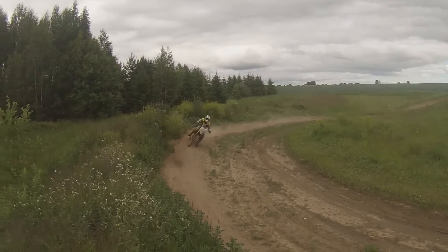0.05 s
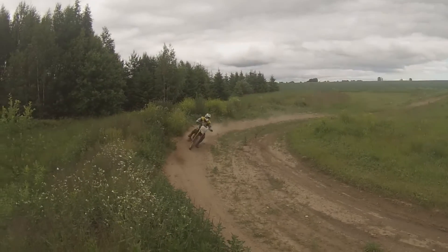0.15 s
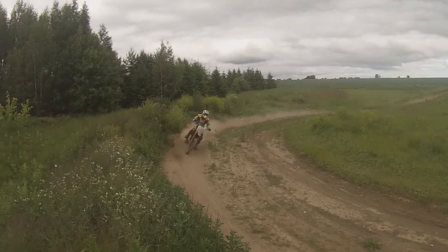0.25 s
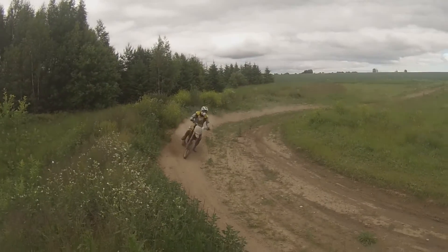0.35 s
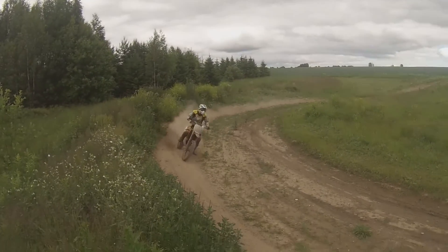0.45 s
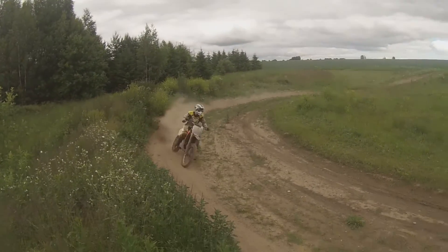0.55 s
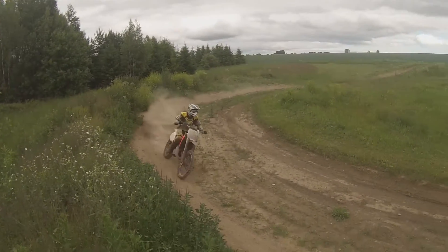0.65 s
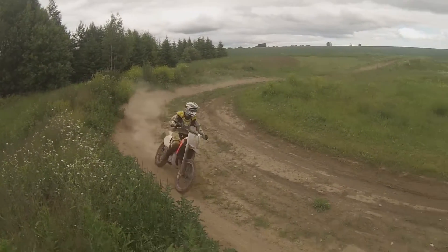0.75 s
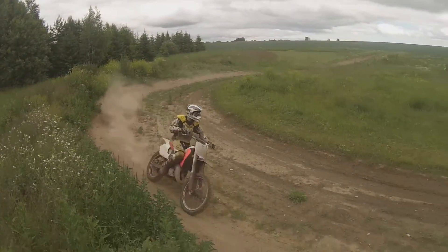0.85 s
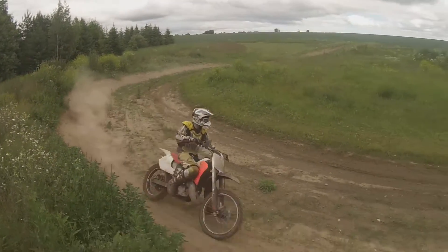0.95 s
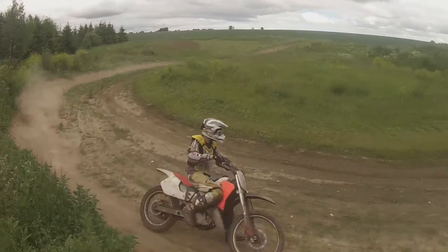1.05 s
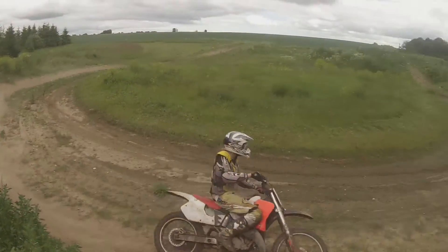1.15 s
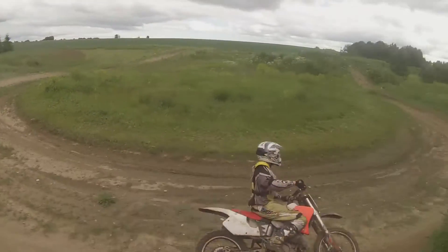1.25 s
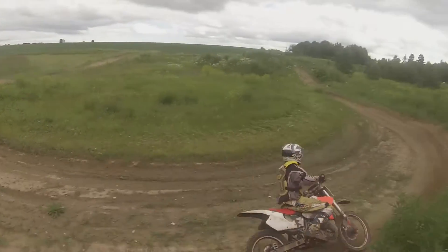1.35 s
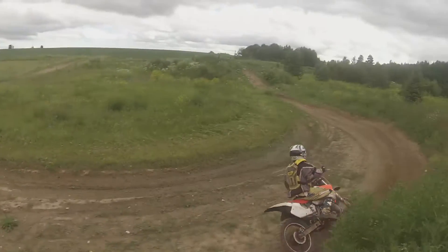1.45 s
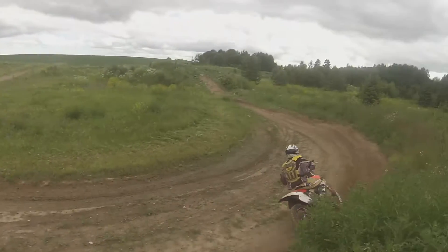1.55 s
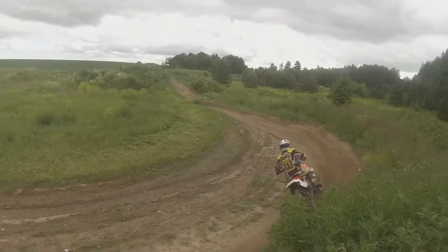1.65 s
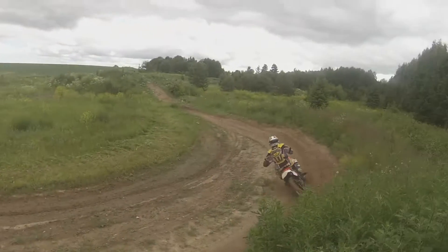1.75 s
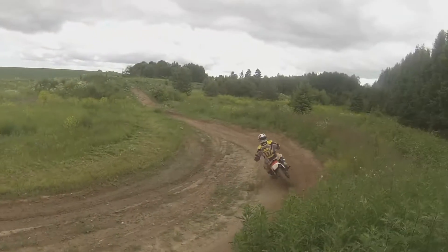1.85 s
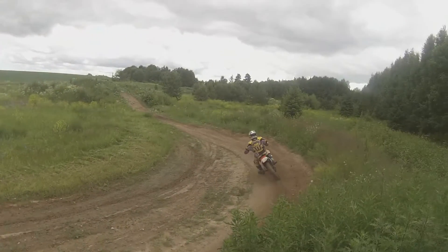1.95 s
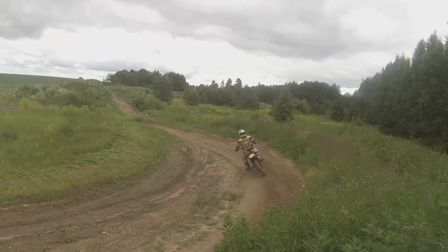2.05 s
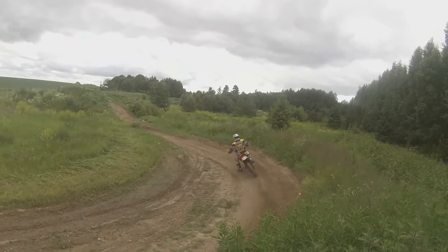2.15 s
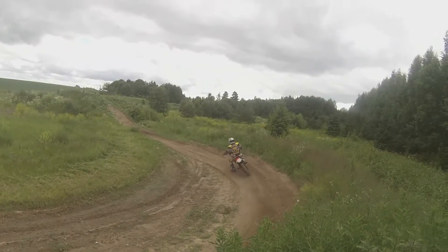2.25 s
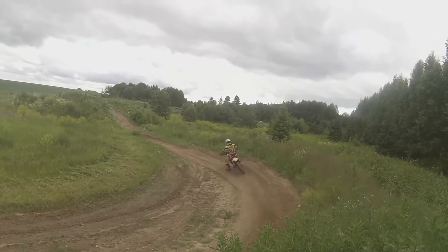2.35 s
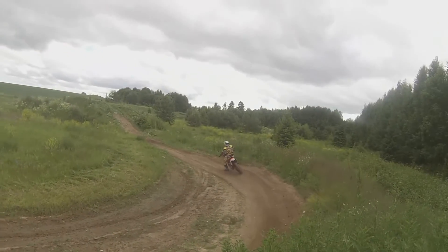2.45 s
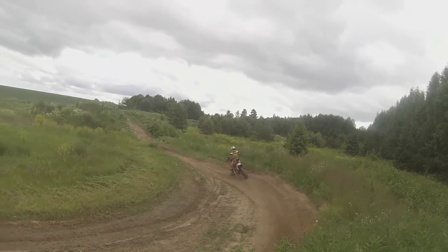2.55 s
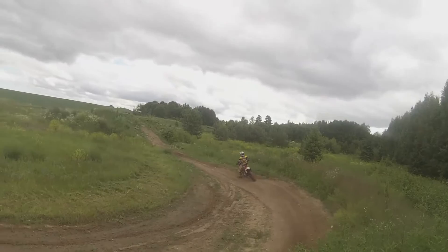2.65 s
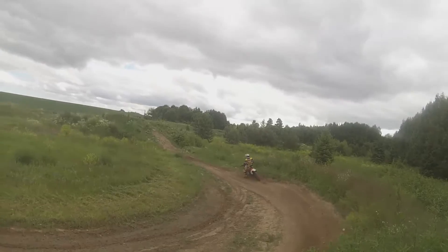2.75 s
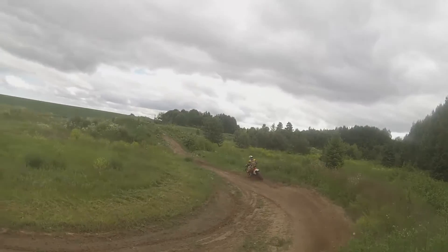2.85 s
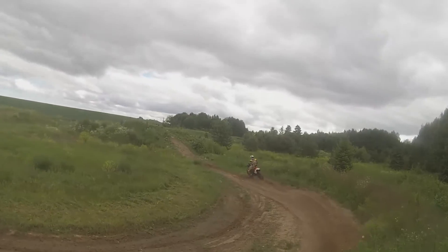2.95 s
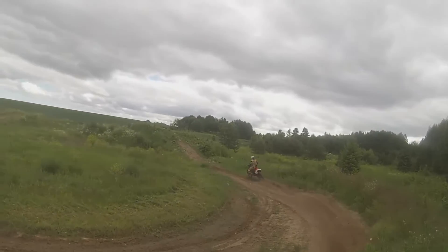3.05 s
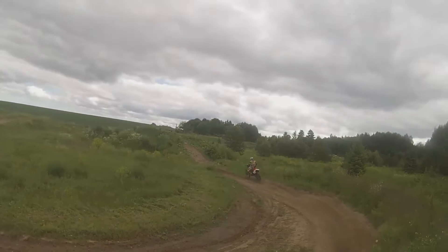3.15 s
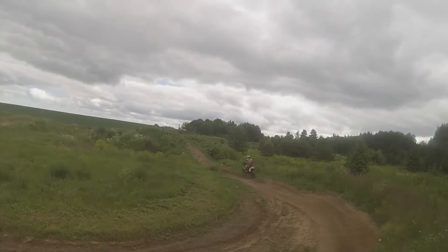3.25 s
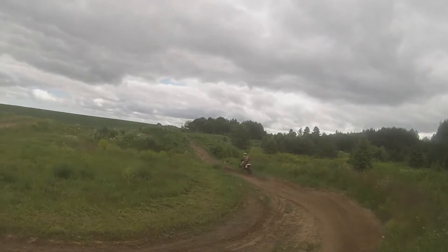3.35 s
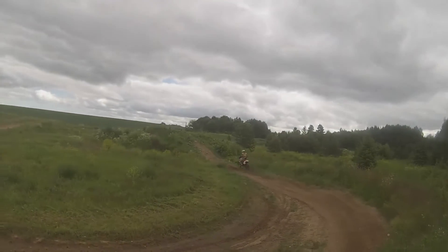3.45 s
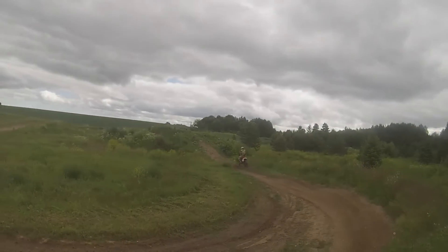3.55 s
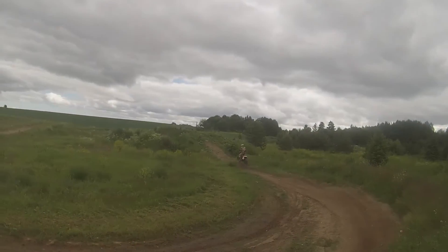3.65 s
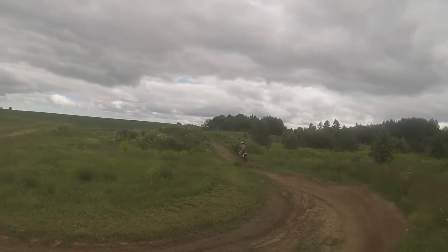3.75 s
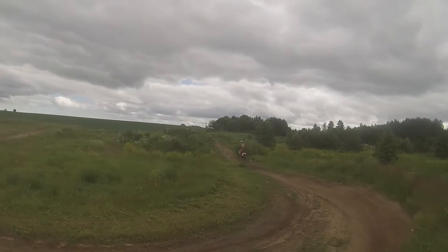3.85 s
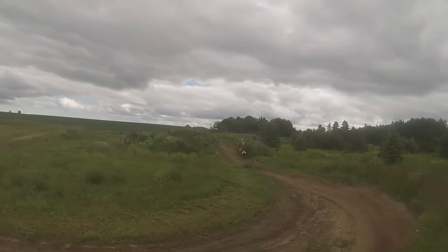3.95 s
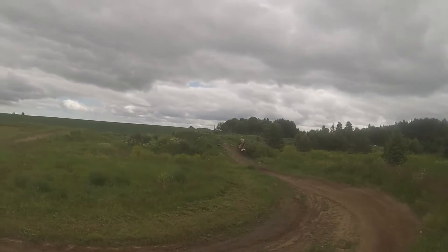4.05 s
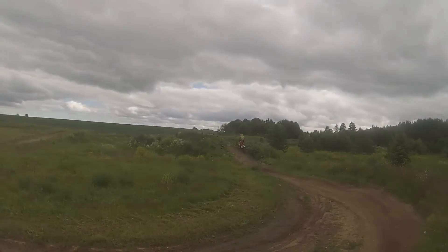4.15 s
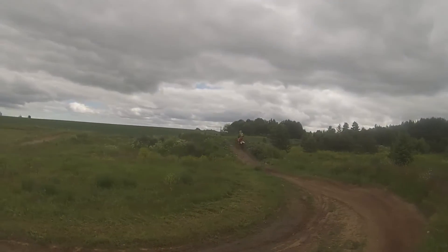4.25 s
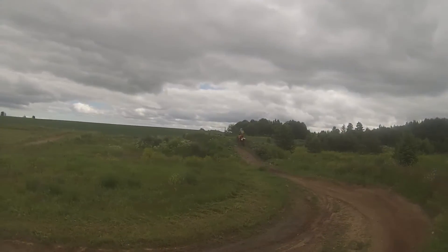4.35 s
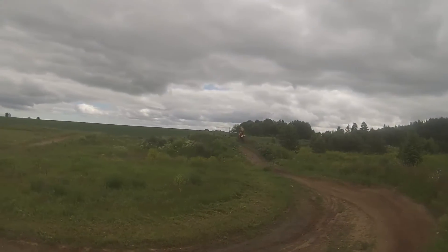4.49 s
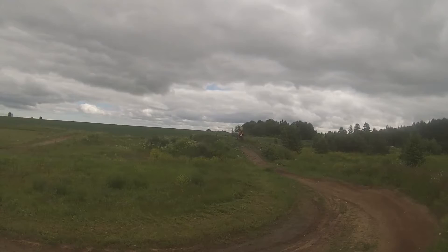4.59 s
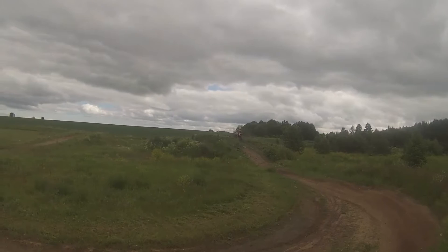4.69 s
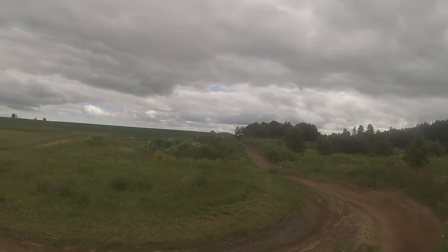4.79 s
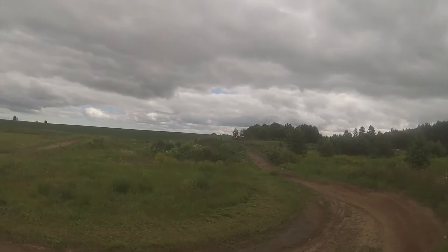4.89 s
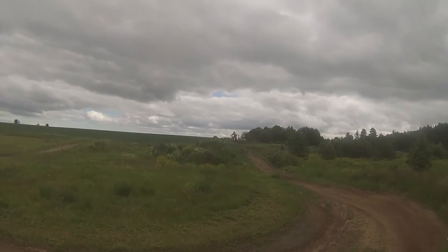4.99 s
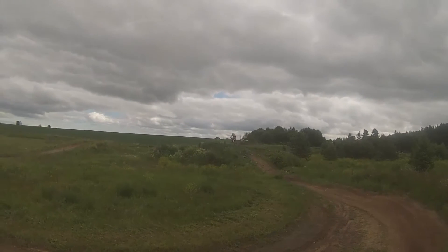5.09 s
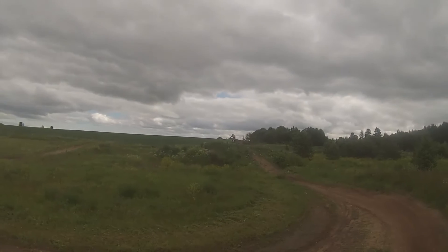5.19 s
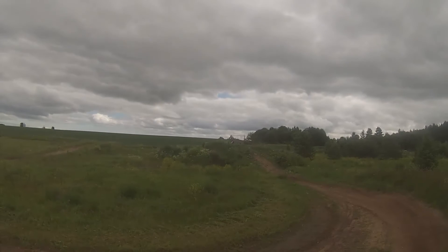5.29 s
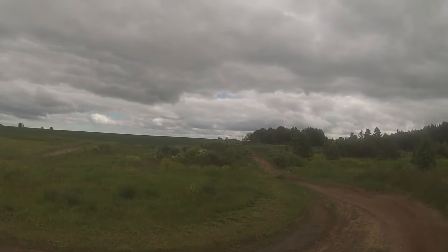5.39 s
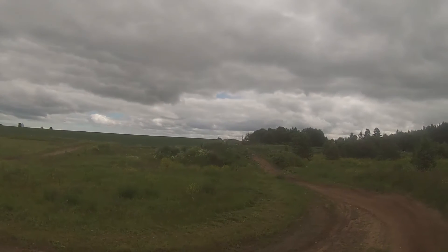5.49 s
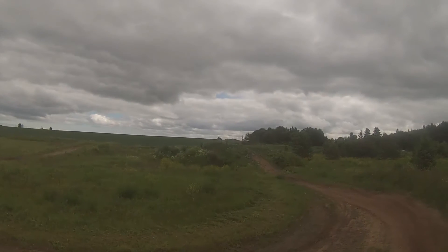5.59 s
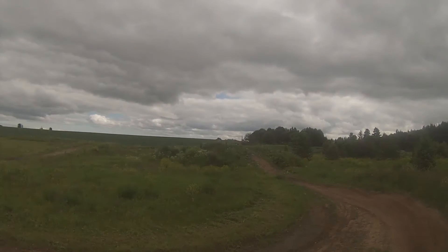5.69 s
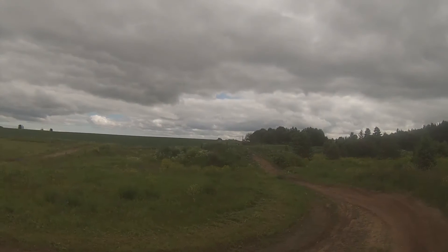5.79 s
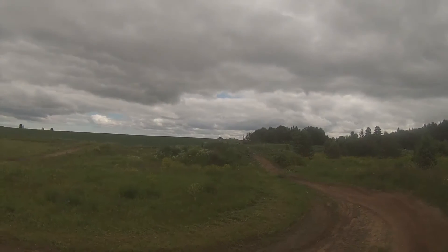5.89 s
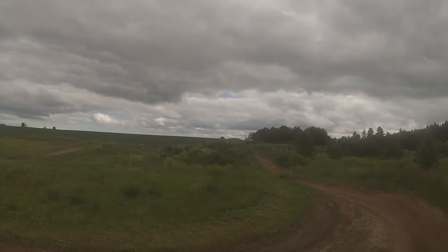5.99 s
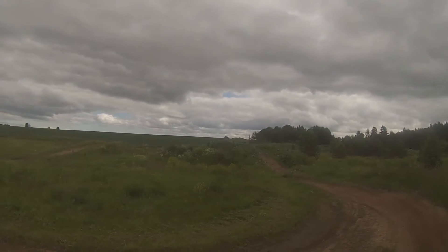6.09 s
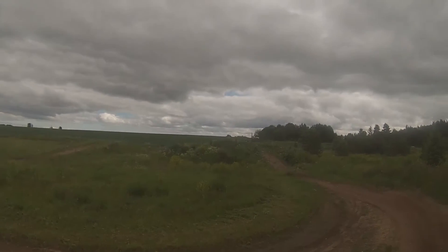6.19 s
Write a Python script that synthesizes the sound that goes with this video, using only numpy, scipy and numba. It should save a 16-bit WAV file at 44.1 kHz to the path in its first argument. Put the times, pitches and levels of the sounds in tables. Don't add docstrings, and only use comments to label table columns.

```python
import sys
import numpy as np
from scipy import signal
from scipy.fft import rfft, irfft, next_fast_len
from scipy.io import wavfile
from scipy.ndimage import uniform_filter1d
from numba import njit

SR = 44100
rng = np.random.default_rng(int(sys.argv[2]) if len(sys.argv) > 2 else 0)


def linear_from_db(decibels):
    return 10 ** (np.asarray(decibels, float) / 20)


def unload_wav(signal):
    wavfile.write(
        sys.argv[1],
        SR,
        np.round(np.clip(np.atleast_2d(signal).T, -1, 1) * 32767).astype(np.int16),
    )


N = 274743

# (frequency [Hz], level [dB per Hz])
FIELD_SPECTRUM = [(47, -29), (80, 9.5), (168, -3), (347, 1.5), (503, -2), (1380, -7), (1640, -4),
                  (2140, -8.5), (2900, -10.5), (3860, -15), (11300, -25.5), (15000, -52)]
FIELD_DB, HISS_DB = -58, -73.5
# (time [s], level [dB])
WIND = [(0, -61), (.99, -54.5), (1.87, -56.5), (3.09, -59), (3.42, -53), (4, -62), (4.6, -59), (5.05, -55),
        (5.74, -60.5), (6.23, -53.5)]
# (time [s], peak [dB], pitch [Hz])
THUMPS = [(4.939, -36, 82.1), (5.032, -58, 78.5), (5.16, -39, 80), (5.235, -42, 80.3), (5.29, -43, 81.1),
          (5.358, -51, 77.5), (5.46, -45, 82), (5.889, -52, 79.7), (5.993, -34.5, 83.9), (6.039, -39, 80.6),
          (6.09, -40, 80.2), (6.123, -41, 80.6), (6.178, -43.5, 80.1)]
# (time [s], peak [dB], length [s])
CHIRPS = [(3.7164, -65, 0.033), (3.808, -62, 0.026), (3.915, -65, 0.047), (4.019, -63, 0.029),
          (4.107, -66, 0.03), (4.204, -67, 0.024), (4.391, -62, 0.031), (4.5144, -76, 0.031),
          (4.5624, -67, 0.03), (4.6126, -62, 0.022), (4.7289, -67, 0.033), (5.0192, -65, 0.027),
          (5.0473, -73, 0.026), (5.1494, -62, 0.025), (5.3854, -63, 0.025), (5.41, -62, 0.023),
          (5.445, -64, 0.025), (5.255, -68, 0.026), (5.955, -66, 0.027), (5.512, -63, 0.019),
          (5.6214, -70, 0.027), (5.714, -65, 0.03), (5.8119, -67, 0.026), (5.922, -63, 0.023),
          (6.045, -63, 0.027), (6.1137, -66, 0.027), (6.212, -66, 0.028)]

# (time [s], firing rate [Hz], level as heard [dB], aim of the tail pipe at the microphone [dB])
PULL_IN = [(0, 119.6, -43, -3), (.085, 123.5, -42.5, -1.5), (.175, 114, -42.5, -1), (.225, 113.4, -43, 2),
           (.265, 105.8, -42.5, 1), (.35, 111.9, -41.5, 2.5), (.43, 123.4, -38.5, 1),
           (.5, 124.6, -36.5, -1), (.545, 128.1, -36.5, -2.5)]
BEND = [(.59, 113.3, -36, -3), (0.649, 112.4, -36, -1.5), (0.676, 114.8, -34.5, -5),
        (0.726, 112.4, -36, -1), (0.805, 111.1, -35, -0.5), (.85, 118.9, -32.5, 1.5),
        (0.891, 117.8, -33, 0)]
COAST_BY = [(0.939, 109.4, -38, -1.3), (1.092, 100.4, -38, -0.23), (1.141, 108.4, -36, -1.2),
            (1.28, 102.4, -37.5, 0.0088), (1.399, 102.8, -38.5, -0.012), (1.49, 101.6, -41.5, 0.67),
            (1.54, 108.1, -32.5, 0.12)]
PULL_OUT = [(1.579, 109, -34, 1.8), (1.628, 118.3, -33.5, 4.3), (1.65, 109.6, -32, 0.5),
            (1.7, 111, -33.5, 0.5), (1.754, 113.2, -32.5, 4.04), (1.804, 115.2, -33.5, 5.36),
            (1.869, 108, -35.5, 5.4), (1.925, 107.8, -36.5, 6.2), (1.971, 103.3, -36.5, 7)]
PULL_AWAY = [(2.01, 106, -37, 7.8), (2.064, 103.2, -36, 4.2), (2.1, 107.4, -35.5, 7.2),
             (2.179, 107.9, -36, 5.7), (2.289, 109.3, -36.5, 3), (2.361, 107.3, -38.5, 3.1),
             (2.476, 105, -39.5, 1.12), (2.511, 100.7, -42, 1.1)]
LIFT = [(2.56, 95.83, -51.5, 4.5), (2.65, 93.86, -48, -5)]
PULL_UP = [(2.711, 99.55, -45, 2), (2.785, 121.3, -42.5, -4), (2.845, 113, -40.5, -1.5),
           (2.904, 111.4, -41, -2.5), (2.965, 103.6, -43, -2), (2.998, 106.8, -41.5, -1.5),
           (3.05, 108.7, -43, -3.5), (3.14, 126.5, -42, -3.5), (3.186, 118.9, -41.5, -4)]
CLIMB = [(3.235, 117.1, -41, -4), (3.283, 103.6, -44.5, -2.5), (3.33, 110.4, -43, -3),
         (3.4, 114.9, -43, -3), (3.45, 110.8, -44.5, -4), (3.49, 113.1, -44.5, -3),
         (3.6, 105.2, -46.5, -0.5), (3.651, 107.6, -46.5, -2)]
COAST_FAR = [(3.699, 113.8, -57, 2), (4.078, 102.5, -64, -7), (4.17, 102, -50, 0.5), (4.441, 87.4, -51, -1),
             (4.51, 85.95, -49.5, -0.5), (4.555, 97.3, -48, -1)]
PULL_FAR = [(4.619, 104.4, -49, 0), (4.7, 110.9, -47.5, 0.5), (4.8, 106.3, -48, -2),
            (4.87, 111.2, -48.5, -2), (4.9, 108.4, -49, -4), (4.975, 91.4, -52, -4),
            (5.039, 93.7, -50.5, -4.5), (5.1, 84.2, -54.5, -5.5)]
RISE = [(5.2, 103.4, -52, -4), (5.27, 90.5, -56.5, -4), (5.401, 107.3, -55, -4), (5.475, 125.7, -52.5, -10),
        (5.545, 142.6, -57, -2)]
FADE = [(5.631, 88.7, -67, 2.9), (5.69, 84.2, -67, 4.3), (5.83, 100, -68, 4.3), (5.9, 112.5, -62.5, 4.9),
        (5.981, 110.9, -64.5, 5.3), (6.048, 101.9, -66, 3.6), (6.111, 111.8, -65.5, 4),
        (6.23, 106.7, -71, 6.9)]
# (opens [s], shuts [s], boom [dB], growl against the level [dB], growl centre [Hz])
THROTTLE = [
    (-.1, 0.885, 4, -8.5, 350),
    (1.585, 2.508, 2.5, -7.5, 378),
    (2.667, 3.655, 2, -5.5, 402),
    (4.53, 5.569, -7.5, -10, 423.8),
    (5.604, 6.403, 4.5, 2, 382.4),
]
# (from [s], to [s])
MISFIRING = [
    (1.512, 1.575),
    (2.56, 2.695),
    (4.14, 4.52),
]
# (time [s], peak [dB], length [s])
STUTTERS = [(1.511, -18.5, 0.0099), (1.5205, -17, 0.01), (1.539, -18.5, 0.0083), (1.548, -22.5, 0.012),
            (1.577, -31, 0.02), (1.607, -32, 0.021), (1.626, -22.5, 0.013), (1.638, -18, 0.0041),
            (2.582, -38.5, 0.015), (2.721, -42, 0.0064), (2.79, -43, 0.017), (4.222, -46, 0.016),
            (4.252, -47, 0.0096), (4.335, -43, 0.014), (4.365, -41, 0.0096), (4.446, -48, 0.0084),
            (4.496, -42, 0.0087), (4.519, -42, 0.0082), (2.676, -36, 0.013), (2.697, -31.5, 0.013),
            (2.706, -38, 0.047), (2.7796, -32.5, 0.027), (3.095, -34, 0.07), (3.133, -32.5, 0.021),
            (4.153, -44, 0.02), (4.18, -36, 0.011), (4.24, -40, 0.012), (4.2815, -40, 0.019),
            (4.3235, -38, 0.01), (4.352, -50, 0.018), (4.388, -38, 0.014), (4.4365, -34, 0.011),
            (4.483, -34, 0.011), (4.518, -64, 0.052)]
CRACKS_S = [1.513, 2.678, 2.698, 4.323, 4.4354, 4.4831, 4.5198]

# (time [s], centre [Hz])
BEARING = [(0, 940), (.4, 972), (.76, 940), (1.56, 1147), (1.64, 1210), (1.7, 861), (1.82, 942), (1.9, 994),
           (2.1, 937), (2.3, 932.4), (2.42, 1118), (2.8, 1064), (2.9, 925.6), (3.2, 940), (4.5, 946.5),
           (4.7, 930), (5.1, 976), (5.6, 890.3), (5.9, 777), (6.23, 768.4)]
# (time [s], centre [Hz], level against the bark [dB])
HONK = [(0, 1375, 5.5), (.25, 1284, 3), (.45, 1230, 2), (.58, 1278, 10.5), (.76, 1300, 15.5),
        (.86, 1339, 10), (.94, 1360, 3), (1.5, 1307, 0.5), (1.63, 1375, 1.5), (1.7, 1300, -53),
        (6.23, 1297, -59)]
# (time [s], boom [dB], growl [dB], bark [dB])
LIE = [(0, 0.5, 1.5, 1), (.25, 3, 5.5, 0.5), (.5, -2, 3.5, 0.5), (.75, 1, -1.5, 0.5), (.88, 1.5, -3, -7.5),
       (.93, -2, -1, -9), (1.2, 2, 1, -4), (1.5, 6.5, 3, 2), (1.7, -2.5, 2.5, 0), (1.95, 3, 5, 1),
       (2.2, 1.5, -4.5, 2), (2.45, 1.5, -8, -0.5), (2.68, -1, 2, -2), (2.71, 4, -3, 1), (2.77, 1, -5, 2),
       (2.805, 0.5, -6, 4), (2.825, -1, -2.5, -4), (3.1, 0.5, 0.5, 1), (3.3, -2, 0.5, 0),
       (3.5, 1.5, 4.5, -4), (3.7, 1, 5, -2), (3.8, -2, -3, -1), (4.1, -3, -10, -6), (4.25, 2, 3, 4),
       (4.45, -6, 2, -3), (4.58, -7, 7, -3), (4.68, -4, -7, -1), (4.9, 3, -4, 1), (5.0, -6.5, 0, 0.5),
       (5.2, 1.5, 0, -0.5), (5.35, 2.5, 7, -1), (5.47, 8, -5, 0), (5.56, 8, 2, 0), (5.66, 0, -1, -5),
       (5.78, -5, 5, -5), (5.92, -2.5, 0, -4), (6.23, 1.5, -5, 3)]
# (from [s], to [s], swing [s], boom [dB], growl shift [Hz])
SIDE_ON = (.8, 1.73, .1, -4.5, 90)
# (from [s], to [s], swing [s], level [dB])
CHOKED = (2.5, 2.815, .04, -8)
# (time [s], depth [0-1])
GROUND = [(0, 0), (.45, 0.98), (.6, 0.23), (.8, 0), (.88, 0.02), (1.55, 0), (1.62, 1), (1.85, 0.8),
          (2.1, 0.73), (2.5, 0), (2.75, 0.7), (3.7, 1), (4.4, 0.37), (6.23, 0.31)]
# (from [s], centre [Hz], width [Hz], depth [0-1])
FAR_DIP = (3.35, 975, 110, .7)

# (centre [Hz], width [Hz], level [dB])
SHOULDER = [(1834, 260, 0.5), (2245, 240, -2.5)]
# (centre [Hz], width [Hz], level [dB])
CASE_MIDDLE = [(2737, 136, 9), (3072, 117, 7), (3480, 152, 4)]
# (centre [Hz], width [Hz], level [dB])
CASE_UPPER = [(3810, 200, -10), (4296, 123, 6), (4590, 178, 0.5), (5240, 244, -1.5), (5370, 73, -11.5)]
# (centre [Hz], width [Hz], level [dB])
CASE_TOP = [(5530, 930, 3.5), (6870, 500, 0.5), (7470, 470, -4.5), (9200, 2000, -6.5)]
SHOULDER_DB, CASE_UPPER_DB = -8.5, -7.5
# (time [s], first ring [Hz], its level [dB], shoulder [dB], fizz [dB])
INCIDENCE = [(0, 1700, 2, 2, 0.5), (.2, 1645, 2.5, 1, 2.5), (.4, 1680, 3.5, -2.5, 3.5),
             (.6, 1678, -6, 1, 1), (.7, 1640, -1.5, 1, 1), (.8, 1640, 6.5, -2, 2.5),
             (.86, 1666, -1, 2, 2.5), (.9, 1666, 2.5, 5, 5.5), (.93, 1717, -1, -2, -2),
             (1.2, 1640, -2, 0.5, -0.5), (1.5, 1657, 1, 4, 3.5), (1.65, 1645, -6, 2.5, 3.5),
             (1.75, 1570, 1.5, -0.5, 2), (1.85, 1698, -10, 2, 1.5), (2.0, 1776, 2.5, 0.5, 1),
             (2.2, 1753, 6, 0.5, 1.5), (2.45, 1779, 4.5, -5, 0.5), (2.65, 1640, 0, 3.5, 5),
             (2.9, 1630, -4.5, 5, 2), (3.15, 1623, 2, 3.5, -2), (3.35, 1654, -3.5, 1.5, 0.5),
             (3.65, 1654, 0.5, 6.5, 4), (4.1, 1664, 4, 5, 5.5), (4.5, 1641, 6, 4.5, 0),
             (4.8, 1654, 0.5, 3, 3.5), (5.1, 1655, -1, -1, 0), (5.5, 1659, 2, 2, 5.5),
             (5.7, 1660, 8, -6, -1), (6.23, 1690, 1, -3, -3)]
# (time [s], middle [dB], upper [dB], air above them [dB])
SLANT = [(0, -3.5, 3, 0), (.2, -2, 3.5, -2), (.4, -0.5, 0, -4), (.6, -1.5, 1, -1), (.8, -0.5, 4, -2.5),
         (.88, -1.5, 3.5, 0), (.93, -4, 1, 2), (1.2, 0, -1, 0), (1.5, -1, -0.5, -1.5),
         (1.65, -1, 3.5, -0.5), (1.8, -1.5, -0.5, 0), (2.0, -1, -1, 0), (2.2, 0.5, 0.5, -1),
         (2.45, -2.5, -2.5, 3), (2.7, -1.5, 1, 0), (2.9, -2, -1, 1), (3.15, 0, -2.5, -2),
         (3.35, -1, -0.5, 1), (3.65, -2, 1.5, 2), (4.1, -1, 1, -2), (4.5, -0.5, -1, 0), (4.75, -2, 0, 1),
         (5.1, -1, 0, 2), (5.5, -2.5, 2.5, -2), (5.7, 0.5, 0, 0), (6.23, -1.5, 2, 0)]

PASSES_S, STRAIGHT_S, HIDDEN_S, CLEAR_S = 1.64, 2.484, 4.3, 5.85
TURN_S, SWING_S, CLEARING_S, BUILD_S = 0.9, 0.033, 0.033, .06
SHUT_BOOM_DB, SHUT_GROWL_DB, SHUT_BARK_DB, SHUT_GROWL_HZ = -16.5, -14, -7, 445
BOOM_PER_AIM, GROWL_PER_AIM, SHUT_GROWL_PER_AIM = 0.24, -0.42, 4.4
OPEN_ROUGH, SHUT_ROUGH, FAR_ROUGH = .24, .93, .24
THUD_DB, THUD_FAR_DB = -19.5, 7
OVERRUN_HZ, OVERRUN_DB, CLATTER_DB, CLATTER_FAR_DB = 505, 2.5, -11, 5.5
HUMS_S = 1.2
SMEAR_S, TIGHT_S, BARK_LAG_S = .007, -.0022, .0021
RING_DB, RING_PER_AIM, RING_BACK_DB, RING_SHUT_DB = -2.5, -2.1, -3, -0.5
FIZZ_DB, FIZZ_SHUT_DB, FIZZ_BACK_DB = -5, -5, -12
COUGH_DB, COUGH_FAR_DB, LOW_COUGH_FAR_DB = -1.5, 3, -12


def level(x, db):
    return x * linear_from_db(db) / np.sqrt(np.mean(x ** 2))


def even(x):
    return x / np.sqrt(uniform_filter1d(x ** 2, SR // 16))


def curves(table):
    s, *columns = np.transpose(table)
    return [np.interp(np.arange(N) / SR, s, c) for c in columns]


def step(at_s, width_s):
    return .5 + .5 * np.tanh((np.arange(N) / SR - at_s) / width_s * 2)


def walk(rate):
    k = int(SR / rate)
    held = np.repeat(rng.standard_normal(N // k + 1), k)
    return 1.603 * uniform_filter1d(uniform_filter1d(held, k), k)[:N]


@njit
def svf(x, hz, width):
    y, b, l = np.empty(len(x)), 0., 0.
    for i in range(len(x)):
        g, k = np.tan(np.pi * hz[i] / SR), width / hz[i]
        v = (b + g * (x[i] - l)) / (1 + g * (g + k))
        b, l, y[i] = 2 * v - b, l + 2 * g * v, k * v
    return y


def band(x, hz, width_hz, order=1):
    lead = SR // 20
    x = np.pad(x, (lead, 0), "reflect")
    hz = np.pad(hz * np.ones(N), (lead, 0), "edge")
    for _ in range(order):
        x = svf(x, hz, 1. * width_hz)
    return x[lead:]


def bursts(table, rise_s):
    after, out = np.arange(SR // 4) / SR, np.zeros(N + SR)
    for s, db, length in table:
        i = int(s * SR)
        shape = (1 - np.exp(-after / rise_s)) * np.exp(-(after / length) ** 2)
        out[i:i + len(after)] += linear_from_db(db) * shape
    return out[:N]


def field():
    rustle = 0
    hz_points, db_points = np.transpose(FIELD_SPECTRUM)
    for hz in 90 * 2 ** np.arange(0, 7.6, .5):
        db = np.interp(np.log(hz), np.log(hz_points), db_points) + 2 * walk(9)
        rustle = rustle + linear_from_db(db) * band(rng.standard_normal(N), hz, hz / 2, order=2)
    rumble = band(rng.standard_normal(N), 24, 81, order=2) * linear_from_db(2.2 * walk(21))
    hiss = level(rng.standard_normal(N), HISS_DB)
    return hiss + level(rustle, FIELD_DB) + level(rumble, 2.06) * linear_from_db(curves(WIND)[0])


def grasshopper():
    clicks = rng.standard_normal(N) * linear_from_db(2 * walk(350))
    return level(band(clicks, 11400, 2600, order=2), -8.5) * bursts(CHIRPS, .003)


def thumps():
    t, out = np.arange(int(.08 * SR)) / SR, np.zeros(N + SR)
    for s, db, hz in THUMPS:
        i = int((s + 0.003753) * SR)
        swing = np.sin(2 * np.pi * hz * t * np.exp(-t * 14))
        out[i:i + len(t)] += 2.38 * linear_from_db(db) * swing * np.exp(-t * hz * 3.42)
    return out[:N]


def ride():
    near = PULL_IN + BEND + COAST_BY + PULL_OUT + PULL_AWAY
    far = LIFT + PULL_UP + CLIMB + COAST_FAR + PULL_FAR + RISE + FADE
    return curves(near + far)


def throttle(values, shut, swing_s):
    out = shut
    for (opens_s, shuts_s, *_), value in zip(THROTTLE, values):
        out = out + (step(opens_s, swing_s) - step(shuts_s, SWING_S)) * (value - shut)
    return out


def opened(swing_s):
    return throttle(np.ones(len(THROTTLE)), 0., swing_s)


def roughness():
    open_rough = OPEN_ROUGH + FAR_ROUGH * step(HIDDEN_S, TURN_S)
    return SHUT_ROUGH + opened(CLEARING_S) * (open_rough - SHUT_ROUGH)


@njit
def fire(hz, stretch, size):
    pulses, phase, held, p, k = np.zeros(len(hz) + 1), np.empty(len(hz)), np.empty(len(hz)), 1., 0
    for i in range(len(hz)):
        advance = hz[i] * stretch[k] / SR
        p += advance
        if p >= 1:
            p, k = p - 1, k + 1
            pulses[i] += p / advance
            pulses[i + 1] += 1 - p / advance
        phase[i], held[i] = p, size[k]
    return pulses[:-1], phase, held


def scatter(x, tail_s, direct):
    t = np.arange(int(5 * tail_s * SR)) / SR
    turn = np.pi * np.arange(N) / SR * 1.1 + .6 * walk(4)
    paths = rng.standard_normal((2, len(t))) * np.exp(-t / tail_s)
    a, b = (signal.fftconvolve(x, p / np.sqrt(np.sum(p ** 2)))[:N] for p in paths)
    return direct * x + np.cos(turn) * a + np.sin(turn) * b


def smear(x, late_s):
    size = next_fast_len(N + SR // 10)
    hz = np.arange(size // 2 + 1) * SR / size
    lag_s = late_s * np.clip((1250 - hz) / 700, 0, 1)
    turned = np.exp(-2j * np.pi * np.cumsum(lag_s) * SR / size)
    return irfft(rfft(x, size) * turned, size)[:N]


def modes(x, table):
    out = 0
    for k, (hz, width, db) in enumerate(table):
        drift, swell_db = 1 + .008 * walk(9), 1.5 * walk(16)
        out = out + (-1) ** k * linear_from_db(db + swell_db) * band(x, hz * drift, width)
    return even(out)


def load():
    _, heard_db, aim_db = ride()
    _, _, pull_boom_db, pull_growl_db, pull_growl_hz = np.transpose(THROTTLE)
    on = opened(SWING_S)
    boom_db = heard_db + throttle(pull_boom_db, SHUT_BOOM_DB, BUILD_S) + BOOM_PER_AIM * aim_db
    growl_db = heard_db + throttle(pull_growl_db, SHUT_GROWL_DB, SWING_S)
    growl_db = growl_db + aim_db * (on * GROWL_PER_AIM + (1 - on) * SHUT_GROWL_PER_AIM)
    a, b, swing_s, side_db, shift_hz = SIDE_ON
    side = step(a, swing_s) - step(b, swing_s)
    a, b, swing_s, choked_db = CHOKED
    growl_db = growl_db + choked_db * (step(a, SWING_S) - step(b, swing_s))
    growl_hz = throttle(pull_growl_hz, SHUT_GROWL_HZ, SWING_S) + shift_hz * side * on
    bark_db = heard_db + aim_db + (1 - on) * SHUT_BARK_DB
    return boom_db + side_db * side, growl_db, growl_hz, bark_db, curves(BEARING)[0]


def colour():
    _, heard_db, aim_db = ride()
    back, on = step(PASSES_S, TURN_S), opened(SWING_S)
    aimed_db = RING_PER_AIM * aim_db * on * (1 - step(HIDDEN_S + 1.113, SWING_S))
    ring_db = RING_DB + back * (RING_BACK_DB + aimed_db) + RING_SHUT_DB * (1 - on)
    fizz_db = FIZZ_DB + FIZZ_BACK_DB * back + FIZZ_SHUT_DB * (1 - on) * (1 - back)
    return heard_db, ring_db, fizz_db


def overrun(pulses, puff):
    hum_db = OVERRUN_DB - 6.3 * (1.5 - step(HUMS_S, 0.075))
    hum = even(band(pulses, OVERRUN_HZ, 100, order=3)) * linear_from_db(hum_db)
    clatter_db = CLATTER_FAR_DB * step(HIDDEN_S - .3, SWING_S) + 4.7 * (2.5 - step(HUMS_S, 0.13))
    return hum + level(band(puff, 274, 140, order=2), CLATTER_DB) * linear_from_db(clatter_db)


def tail_pipe(pulses, size, puff, bark_hz):
    far = step(STRAIGHT_S, SWING_S) - step(CLEAR_S, SWING_S)
    gas = .2 + 1.8 * (1 - opened(CLEARING_S)) + .3 * far
    source = level(scatter(pulses * linear_from_db(.7 * size), .004, 3), 0) + gas * level(puff, 0)
    honk_hz, honk_db = curves(HONK)
    honk = band(source, honk_hz, 120, order=2) * linear_from_db(honk_db)
    low = .7 * (.2 + .8 * opened(SWING_S) + .6 * step(HIDDEN_S, SWING_S) + 1.5 * step(CLEAR_S, SWING_S))
    bark = band(source, uniform_filter1d(bark_hz, SR // 20), 430, order=3)
    bark = bark + low * band(source, 795, 126, order=2) - 0.21 * band(source, 558, 196, order=2)
    past = step(PASSES_S, SWING_S)
    tight = np.roll(smear(bark, TIGHT_S), int(BARK_LAG_S * SR))
    bark = (1 - past) * smear(bark, SMEAR_S) + past * tight
    bark = bark - .85 * band(bark, 1505, 290)
    far_s, far_hz, far_width_hz, depth = FAR_DIP
    bark = bark - depth * step(far_s, 0.28) * band(bark, far_hz, far_width_hz)
    return even(bark) - honk / np.std(bark)


def pipe(pulses, size, puff):
    boom_db, growl_db, growl_hz, bark_db, bark_hz = load()
    boom_db, growl_db, bark_db = np.array([boom_db, growl_db, bark_db]) + curves(LIE)
    boom = even(band(pulses, 225, 120, order=4))
    thud_db = THUD_DB + THUD_FAR_DB * step(STRAIGHT_S, TURN_S)
    thud = even(band(pulses, 102, 66, order=3)) * linear_from_db(thud_db)
    boom = (boom + thud) * linear_from_db(boom_db + .5 * size)
    growl = level(pulses, 0) + 1.2 * roughness() ** 3 * level(puff, 0)
    growl = even(band(growl, uniform_filter1d(growl_hz, SR // 10), 200, order=4))
    growl = (growl + overrun(pulses, puff) * (1 - opened(CLEARING_S))) * linear_from_db(growl_db)
    upper = growl + tail_pipe(pulses, size, puff, bark_hz) * linear_from_db(bark_db)
    return boom + upper - curves(GROUND)[0] * band(upper, 567, 320)


def case(gas, puff, ring_db, fizz_db):
    ring_hz, turn_ring_db, shoulder_db, turn_fizz_db = curves(INCIDENCE)
    middle_db, upper_db, air_db = curves(SLANT)
    ring = band(gas, ring_hz, 250, order=3) + 0.97 * band(gas, ring_hz + 95, 148, order=2)
    ring = even(ring) * linear_from_db(ring_db + turn_ring_db)
    hissing = gas + .7 * level(puff, 0)
    air = even(band(hissing, 10540, 6300, order=2)) * linear_from_db(air_db - 13)
    fizz = (modes(hissing, CASE_TOP) + air) * linear_from_db(fizz_db + turn_fizz_db)
    upper = modes(gas, CASE_UPPER) * linear_from_db(CASE_UPPER_DB + upper_db)
    shoulder = modes(gas, SHOULDER) * linear_from_db(SHOULDER_DB + shoulder_db)
    return ring + shoulder + modes(gas, CASE_MIDDLE) * linear_from_db(middle_db) + upper + fizz


def rasp(pulses, size, puff):
    rasp_db, ring_db, fizz_db = colour()
    rough = roughness()
    cracks = scatter(pulses * linear_from_db(0.51 * size), .006, 0.027)
    gas = np.sqrt(1 - rough) * level(cracks, 0) + np.sqrt(rough) * level(puff, 0)
    gas = gas * linear_from_db(2.85 * walk(24.905))
    for s in CRACKS_S:
        gas[int(s * SR)] += 10 * linear_from_db(-5.5)
    steady = case(gas, puff, ring_db, fizz_db)
    runs = .3 * bursts(STUTTERS, .0018)
    gone = step(STRAIGHT_S, SWING_S)
    cough = level(band(gas + level(puff, -17), 1020, 400, order=2), COUGH_DB)
    low_cough = level(band(gas, 452, 240, order=2), -4) * linear_from_db(LOW_COUGH_FAR_DB * gone)
    cough = (cough + low_cough) * linear_from_db(COUGH_FAR_DB * gone)
    t = np.arange(N) / SR
    missed = uniform_filter1d(sum(1. * (t > a) * (t < b) for a, b in MISFIRING), SR // 100)
    return steady * (linear_from_db(rasp_db - 8 * missed) + runs) + cough * runs


def bike():
    hz = ride()[0] * (1 + .002 * walk(14))
    chance = rng.standard_normal((N // 100, 2)).T
    pulses, phase, size = fire(hz, 1 + .003 * chance[0], chance[1])
    puff = (.6 + np.exp(-phase / .3)) * rng.standard_normal(N)
    return pipe(pulses, size, puff) + rasp(pulses, size, puff)


def scene():
    return (field() + grasshopper() + thumps() + bike())[None, :]


def roll_off(x):
    return signal.sosfilt(signal.butter(12, 15180, fs=SR, output="sos"), x)


def record(dry):
    return roll_off(dry)


dry = scene()
out = record(dry)
unload_wav(out)
```